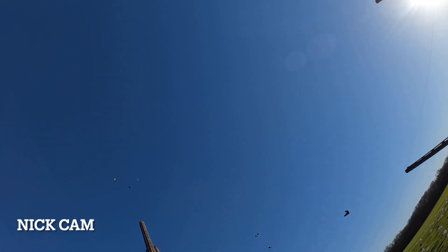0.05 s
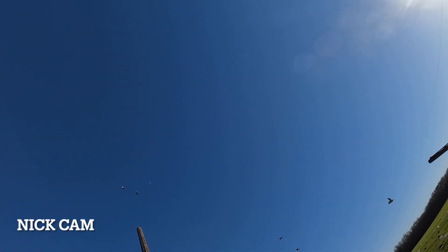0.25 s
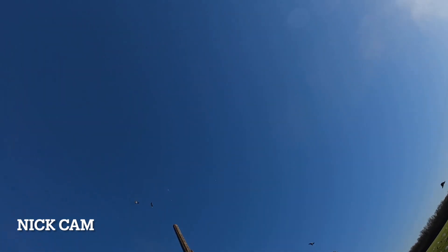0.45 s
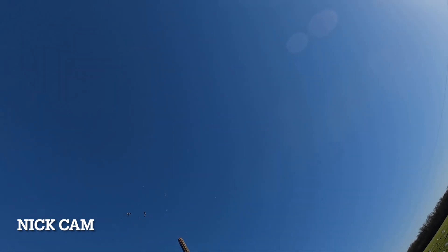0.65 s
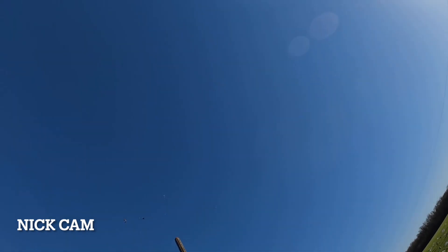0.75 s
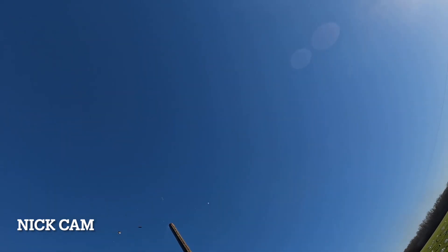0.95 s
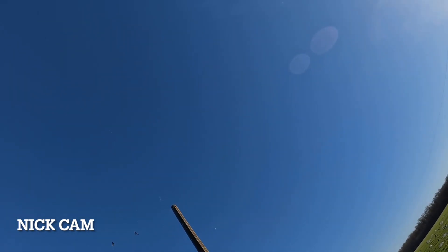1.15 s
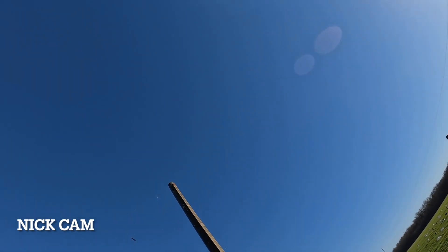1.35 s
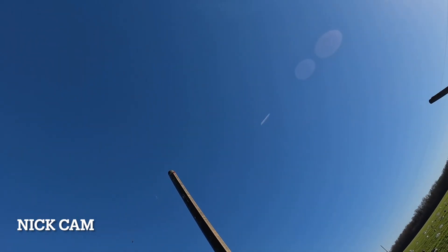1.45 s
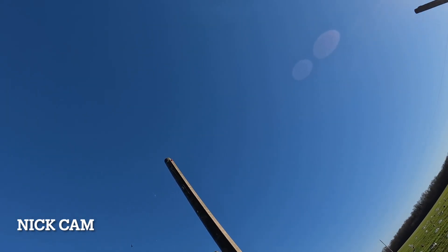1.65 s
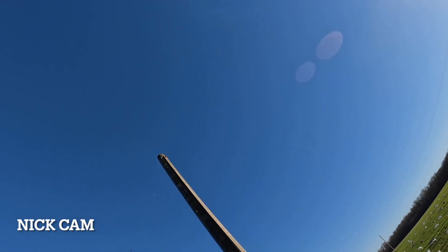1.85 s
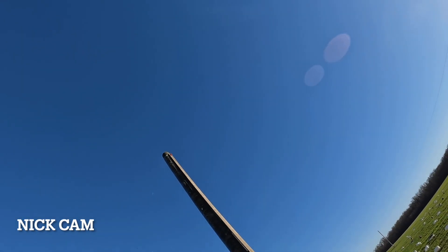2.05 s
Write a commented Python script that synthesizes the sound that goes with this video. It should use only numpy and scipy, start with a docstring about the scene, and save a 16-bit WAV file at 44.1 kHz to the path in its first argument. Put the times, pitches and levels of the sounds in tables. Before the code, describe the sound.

A ragged volley of shotguns fires close to a small camera in an open field, overlapping cracks and thumps with brief hiss and metallic ringing, distant thuds, rolling echoes from trees and faint low wind.

```python
"""A line of shotguns fires a ragged volley over an open field, close to a small camera. Each report is a
dispersed muzzle blast, its duller bounce off the grass and a brief crack of gas. Swelling hiss and narrow
ringing partials, both shaped noise, crest at many of the reports. Decaying noise gives the scatter from close
by and the long roll returned by the field and trees. A few distant guns thud, and a low wind rumble lies under
everything."""
import sys
import numpy as np
from scipy import signal
from scipy.fft import rfft, irfft
from scipy.io import wavfile
from scipy.ndimage import map_coordinates

SR = 44100
rng = np.random.default_rng(int(sys.argv[2]) if len(sys.argv) > 2 else 0)


def unload_audio(sound):
    """Save the sound as a 16-bit wav file, at the path given as the first command line argument."""
    columns = np.transpose(np.atleast_2d(sound))
    # keep every value between -1 and 1, then stretch to whole-number steps
    steps = np.round(np.clip(columns, -1, 1) * 32767)
    wavfile.write(sys.argv[1], SR, steps.astype(np.int16))


N = 92610

# The volley. Each row: start in seconds, blast level in dB, bass shelf in dB, treble shelf in dB,
# top of the band in Hz, pitch of the crack in Hz, delay of the ground bounce in ms,
# bounce level relative to the blast in dB before dulling, far echo level in dB above FAR_DB.
SHOTS = [(0.2456, -10.5, -3.5, -0.5, 12900, 1300, 6.6, 0.5, 2.5),
         (0.2723, -11.5, 3, -9.5, 13000, 1060, 5.4, -0.5, -1.5),
         (.2868, -13.5, 2, -12, 15000, 880, 5.1, -6, 0.5),
         (0.4181, -12, -1.5, 6.5, 13100, 1080, 9.2, 0.5, 5),
         (0.4747, -14.5, 5, -0.5, 4420, 1220, 3.47, 2.5, -22),
         (0.5689, -15.5, 7, -5.5, 3940, 870, 3.04, -1, -2.5),
         (0.6418, -11.5, 4, -4.5, 14000, 780, 4.54, -0.5, 3.5),
         (0.659, -15, -4, -0.5, 14000, 1460, 8.3, 3, -7),
         (0.923, -11.5, 3.5, -13, 13000, 1040, 5.62, 0, 1.5),
         (1.0233, -8.5, -1, 1.5, 14000, 1430, 7.84, -3, 4),
         (1.1425, -9, -1.5, -7, 14000, 1010, 5.9, -3, 4.5),
         (1.1695, -14, 4.5, -5.5, 14000, 1000, 5.1, -3, -6),
         (1.2526, -10, -2.5, -12, 14000, 633, 4.32, 4, -1.5),
         (1.5959, -7.5, -3.5, -18.5, 14000, 980, 6.17, 1, 4.5),
         (1.7510, -14.5, 4.5, -3, 3940, 930, 2.75, 1, -3.5), (1.81, -10.5, -2, -5, 7900, 1060, 4.92, 3, 0)]
# Spectrum common to all muzzle blasts. Each row: frequency in Hz, gain in dB.
BLAST_SPECTRUM = [(20, -18), (50, -4), (100, 3), (160, 1.5), (300, -1.5), (600, -8), (1100, -14),
                  (2400, -21), (4000, -32.5), (7000, -38), (15000, -56)]
BASS_HZ, TREBLE_HZ, GROUND_HZ = 201, 1920, 370  # tone corners; the grass dulls the bounce
CRACK_DB, CRACK_Q = 6.5, 3.9  # a broad peak at the pitch of the crack
SMEAR_Q, THUMP_HZ, THUMP_Q = 1.01, 306, 0.34  # the crack arrives just ahead of the thump
# Distant guns. Each row: start in seconds, level in dB.
THUDS = [(0.025, -23), (.052, -29), (.132, -29), (0.555, -25.5), (1.204, -27)]
THUD_HZ = 304

# Spectrum of the gas leaving the muzzle. Each row: frequency in Hz, relative level in dB.
SPIT_SPECTRUM = [(300, 0), (900, -1.5), (2000, -2), (3800, -4.5), (7000, -17), (10500, -27), (13000, -13),
                 (15500, -28)]
SPIT_DB, SPIT_T60_S = -2, 0.019  # level relative to the blast, before the treble setting

# Swells of hiss. Each row: time of the crest in seconds, level in dB, swell t60 in seconds.
SIZZLES = [(0.2454, -16, 0.06), (.274, -18.5, 0.044), (0.287, -24, 0.019), (.417, -13.5, 0.056),
           (.440, -20.5, 0.045), (0.64, -20.5, 0.066), (0.66, -16, 0.014), (.786, -34.5, 0.11),
           (.923, -18.5, 0.045), (1.024, -16, 0.045), (1.141, -19.5, 0.082), (1.254, -25, 0.056),
           (1.597, -15.5, .055), (1.810, -21, 0.041)]
# Spectrum of the hiss. Each row: frequency in Hz, relative level in dB.
HISS_SPECTRUM = [(100, -24), (500, 5), (1200, 1.5), (2200, -1), (3500, -1.5), (5000, -10), (8000, -13),
                 (11000, -24), (13000, -16.5), (15800, -46)]
SIZZLE_T60_S = .06  # decay after the crest
BANDED_DB, BAND_HZ = 6, 150  # the hiss is uneven in pitch: depth and width of its bands
GRAIN_DB, GRAIN_HZ = 2.5, 293.3  # and rough in time: depth and rate

# Metallic ringing that leads the nearest reports. Each row: time of the crest in seconds, level in dB,
# list of partials, each with its centre in Hz, width in Hz and relative level in dB.
RINGS = [(0.246, -18.5, [(1600, 81, 0), (2330, 59, -7), (4610, 270, -15), (8100, 110, -16),
         (9610, 97, -19)]), (.418, -19, [(1224, 67, 0), (3170, 87, -7), (5030, 190, -10),
         (7880, 150, -19.5)]), (.641, -16, [(590, 94, 2), (3650, 110, -6), (7340, 260, -24),
         (8830, 110, -23)]), (0.922, -15, [(1663, 140, -3.5), (2480, 80, -4.5), (3260, 210, 1),
         (5210, 130, -12), (6690, 120, -19), (8490, 86, -32)]), (1.021, -24.5, [(1690, 82, -8),
         (2800, 230, -1), (4670, 180, -1), (7240, 110, -9)]), (1.141, -22.5, [(2640, 91, -2),
         (3770, 150, -5), (4450, 230, -6.5)]), (1.597, -19.5, [(1450, 82, 2), (3140, 160, -4),
         (3910, 160, -10), (5320, 180, -3.5), (6700, 160, -14), (8700, 130, -17.5)]),
         (1.811, -18, [(1370, 220, -5), (3070, 110, 2.5), (5400, 180, -10.5), (7100, 130, -14),
         (8100, 150, -15)])]
RING_SWELL_S, RING_T60_S, RING_LEAD_S = 0.082, 0.027, 0.03  # rise t60, fall t60, half-length of the gate
RING_GRAIN_DB, RING_GRAIN_HZ = 4, 450  # the partials flutter: depth and rate

# Spectrum of the scatter from close by. Each row: frequency in Hz, relative level in dB.
NEAR_SPECTRUM = [(30, -57), (100, -9), (200, 11.5), (500, -3.5), (1200, -6), (3000, -17), (7000, -36.5),
                 (15000, -42)]
NEAR_DB, NEAR_T60_S, NEAR_RISE_S = -6.5, .15, 0.0027  # level relative to the blast

# Initial spectrum of the far echo. Each row: frequency in Hz, relative level in dB.
FAR_SPECTRUM = [(30, 8.5), (100, -4.5), (200, 5.5), (400, -6), (750, -2), (1150, -1.5), (2000, -8),
                (3300, -10.5), (5000, -19.5), (8000, -23), (10800, -30.5), (13000, -23.5), (15800, -47)]
# Decay of the far echo. Each row: frequency in Hz, t60 in seconds.
FAR_T60 = [(100, 1.26), (500, 1.63), (1500, 0.82), (4000, 0.84), (8000, 0.59), (14000, 0.52)]
FAR_DB, FAR_RISE_S, FAR_LUMPS_DB = -32.5, 0.0033, 1.5
EARLIER_S, EARLIER_DB = .12, 6  # a shot this long before the start still echoes; dB above FAR_DB

# Spectrum of the wind. Each row: frequency in Hz, relative level in dB.
WIND_SPECTRUM = [(20, 1.5), (45, 3), (120, 0.5), (300, -11), (1000, -18), (4000, -47), (15000, -74)]
WIND_DB = -38

# The right side is duller. Each row: frequency in Hz, gain in dB.
RIGHT_PORT = [(9000, 0), (11000, -7), (13000, -11.5), (16000, -11)]
CEILING, TOP_HZ = 0.86, 15700  # limit of the rounded peaks, band limit
SIZE = 2 ** 17  # transform length in samples
HZ = np.fft.rfftfreq(SIZE, 1 / SR)


def amp(db):
    """Decibel definition: level in dB to amplitude ratio."""
    return 10 ** (np.asarray(db) / 20)


def unit(x):
    """Normalisation to an rms of 1."""
    return x / np.sqrt(np.mean(x ** 2) + 1e-20)


def along(points, hz):
    """Interpolation of (Hz, value) points on a logarithmic frequency axis."""
    f, v = np.transpose(points)
    return np.interp(np.log(hz + 1), np.log(f + 1), v)


def fade(t, t60):
    """Exponential decay: falls by 60 dB in t60."""
    return np.exp(-np.log(1000) * t / t60)


def crest(t, rise_s, fall_s):
    """Two-sided exponential: swells up to t = 0 and dies away after it."""
    return fade(abs(t), np.where(t < 0, rise_s, fall_s))


def add(out, x, s):
    """Superposition: mix x into out from time s on."""
    i = round(s * SR)
    x, i = x[max(-i, 0):], max(i, 0)
    out[i:i + len(x)] += x[:len(out) - i]


def noise(gain, size):
    """Spectral shaping: noise of rms 1 with the spectrum gain(Hz)."""
    spectrum = rfft(rng.standard_normal(size))
    return unit(irfft(spectrum * gain(np.fft.rfftfreq(size, 1 / SR)), size))


def wobble(x, size=512):
    """Spline interpolation: a smooth random curve with one knot for each step of x."""
    return map_coordinates(rng.standard_normal(size), [x], mode="mirror")


def causal(gain):
    """Minimum phase: folding the cepstrum gives the causal response with this gain."""
    cepstrum = irfft(np.log(gain + 1e-6))
    half = len(cepstrum) // 2
    cepstrum[1:half] *= 2
    cepstrum[half + 1:] = 0
    return np.exp(rfft(cepstrum))


def pulse(gain, crack_hz, size=4096):
    """Dispersion: all-pass lag sweeps a pressure pulse from crack to thump, coloured by gain(Hz)."""
    hz = np.fft.rfftfreq(size, 1 / SR)
    colour = amp(along(BLAST_SPECTRUM, hz))
    # before the crack peak and gain(Hz), the pulse has rms 1 over 10 ms
    scale = np.sqrt(SR / 100 / np.sum(irfft(colour) ** 2))
    crack = amp(CRACK_DB / (1 + (2 * CRACK_Q * (hz / crack_hz - 1)) ** 2))

    def pole(centre, q):
        """Second-order resonance: its denominator over frequency."""
        return centre ** 2 - hz ** 2 + 1j * hz * centre / q

    lag = pole(crack_hz, SMEAR_Q) * pole(THUMP_HZ, THUMP_Q)
    all_pass = np.conj(lag) / lag
    return scale * irfft(causal(colour * crack * gain(hz)) * all_pass)


def blasts():
    """Direct sound and reflection: each blast arrives, then again off the grass; distant guns only thud."""
    out = np.zeros(N)
    for s, db, bass_db, treble_db, top_hz, crack_hz, bounce_ms, bounce_db, _ in SHOTS:
        def tone(hz):
            """Shelving and low-pass filtering of one shot."""
            bass = bass_db / (1 + (hz / BASS_HZ) ** 2)
            treble = treble_db * hz ** 2 / (hz ** 2 + TREBLE_HZ ** 2)
            return amp(bass + treble) / np.hypot(1, (hz / top_hz) ** 5)

        add(out, amp(db) * pulse(tone, crack_hz), s)
        bounce = pulse(lambda hz: tone(hz) / np.hypot(1, hz / GROUND_HZ), crack_hz)
        add(out, amp(db + bounce_db) * bounce, s + bounce_ms / 10 ** 3)
    for s, db in THUDS:
        thud = pulse(lambda hz: 1 / (1 + (hz / THUD_HZ) ** 2), THUD_HZ)
        add(out, amp(db) * thud, s)
    return out


def spit(size=2048):
    """Turbulence: escaping gas gives each blast a brief rough crack, limited to that shot's band."""
    out, t, hz = np.zeros(N), np.arange(size) / SR, np.fft.rfftfreq(size, 1 / SR)
    for s, db, _, treble_db, top_hz, *_ in SHOTS:
        gas = noise(lambda f: amp(along(SPIT_SPECTRUM, f)), size) * fade(t, SPIT_T60_S)
        low_pass = causal(1 / np.hypot(1, (hz / top_hz) ** 8))
        gas = irfft(rfft(gas) * low_pass)
        add(out, amp(SPIT_DB + db + treble_db / 2) * gas, s)
    return out


def sizzle(size=8192):
    """Modulated noise: a hiss, banded in pitch and rough in time, swells to a crest and dies away."""
    out, t = np.zeros(N), (np.arange(size) - size // 2) / SR
    for s, db, swell_s in SIZZLES:
        hiss = noise(lambda hz: amp(along(HISS_SPECTRUM, hz) + BANDED_DB * wobble(hz / BAND_HZ)), size)
        grain = amp(GRAIN_DB * wobble((t - t[0]) * GRAIN_HZ))
        hiss = unit(hiss * grain)
        add(out, amp(db) * hiss * crest(t, swell_s, SIZZLE_T60_S), s + t[0])
    return out


def ringing(size=8192):
    """Narrow-band noise: fuzzy partials set in just before a near report and die soon after the crest."""
    out, t = np.zeros(N), (np.arange(size) - size // 2) / SR
    gate = np.exp(-(t / RING_LEAD_S) ** 10)
    shape = crest(t, RING_SWELL_S, RING_T60_S) * gate
    for s, db, partials in RINGS:
        def peaks(hz):
            """Sum of resonance peaks, one for each partial."""
            return sum(amp(level) / (1 + (2 * (hz - centre) / width) ** 2)
                       for centre, width, level in partials)

        flutter = amp(RING_GRAIN_DB * wobble((t - t[0]) * RING_GRAIN_HZ))
        add(out, amp(db) * shape * unit(flutter * noise(peaks, size)), s + t[0])
    return out


def near_scatter(size=16384):
    """Diffuse scattering: ground and people close by return each blast as briefly decaying noise."""
    out, t = np.zeros(N), np.arange(size) / SR
    shape = fade(t, NEAR_T60_S) * (1 - np.exp(-t / NEAR_RISE_S))
    for s, db, *_ in SHOTS:
        scatter = noise(lambda hz: amp(along(NEAR_SPECTRUM, hz)), size)
        add(out, amp(NEAR_DB + db) * shape * scatter, s)
    return out


def far_echo(size=65536):
    """Frequency-dependent decay: field and trees return a lumpy roll whose treble dies sooner."""
    out, t = np.zeros(N), np.arange(size) / SR
    rise = 1 - np.exp(-t / FAR_RISE_S)
    echoes = [(-EARLIER_S, EARLIER_DB)] + [(row[0], row[-1]) for row in SHOTS]
    for s, db in echoes:
        source = noise(lambda hz: amp(along(FAR_SPECTRUM, hz)), size)
        hz, when, z = signal.stft(source, SR, nperseg=256)
        decay = fade(when, along(FAR_T60, hz)[:, None])
        roll = signal.istft(z * decay, SR, nperseg=256)[1][:size]
        lumps = amp(FAR_LUMPS_DB * noise(lambda hz: np.exp(-hz / 50), size))
        add(out, amp(FAR_DB + db) * roll * lumps * rise, s)
    return out


def wind():
    """Stationary noise: a low, steady rumble of moving air."""
    return amp(WIND_DB) * noise(lambda hz: amp(along(WIND_SPECTRUM, hz)), N)


def scene():
    """Superposition: all sources add, and reach both sides alike."""
    reports = blasts() + spit() + sizzle() + ringing()
    return np.tile(reports + near_scatter() + far_echo() + wind(), (2, 1))


def record(dry):
    """Saturation and band limiting: the camera rounds off peaks, is duller on the right and cuts the top."""
    rounded = dry / (1 + (dry / CEILING) ** 8) ** (1 / 8)
    z = rfft(rounded, SIZE)
    z[1] *= amp(along(RIGHT_PORT, HZ))
    return irfft(z * (HZ < TOP_HZ), SIZE)[:, :N]


dry = scene()
out = record(dry)
unload_audio(out)
```